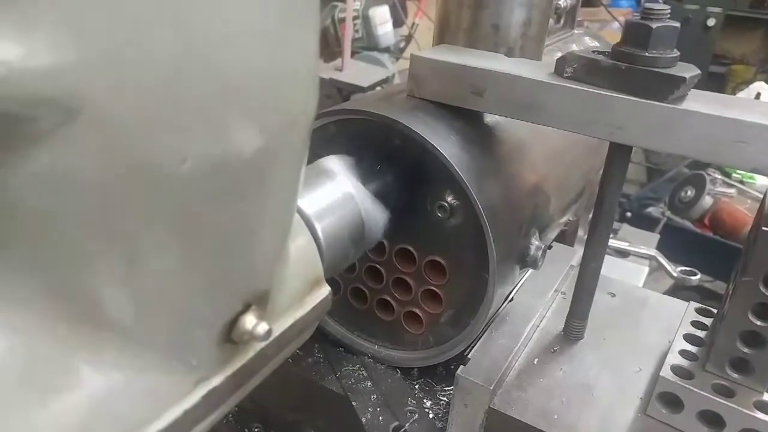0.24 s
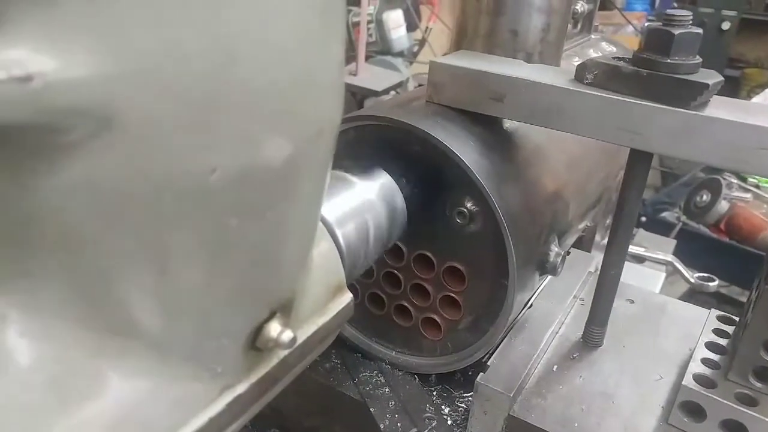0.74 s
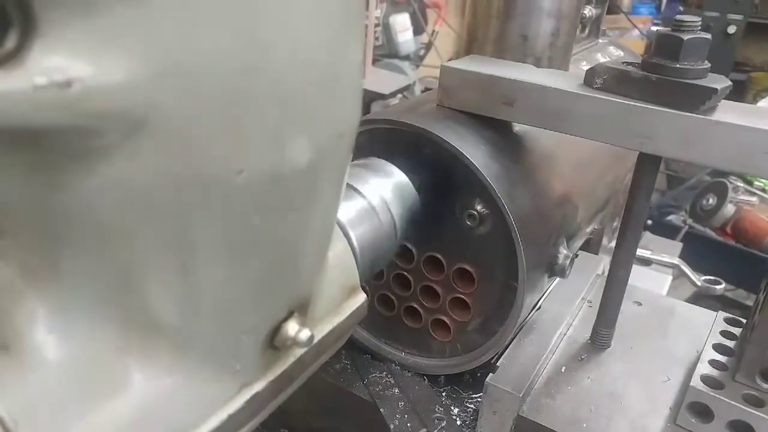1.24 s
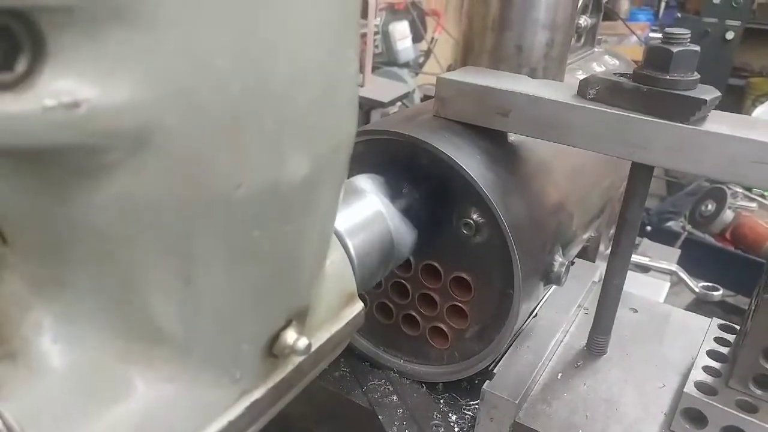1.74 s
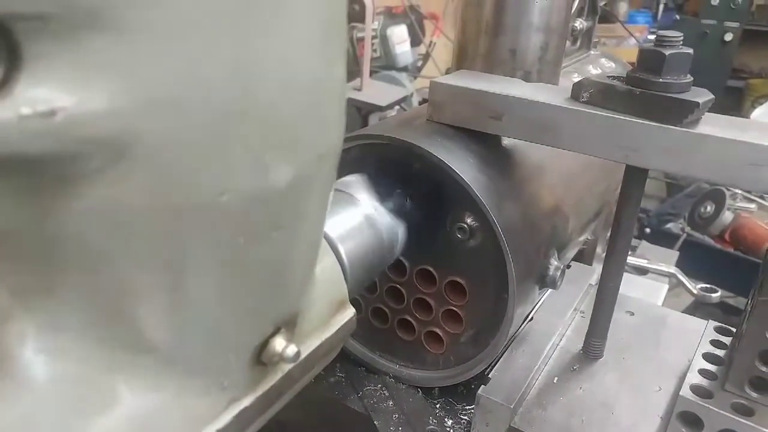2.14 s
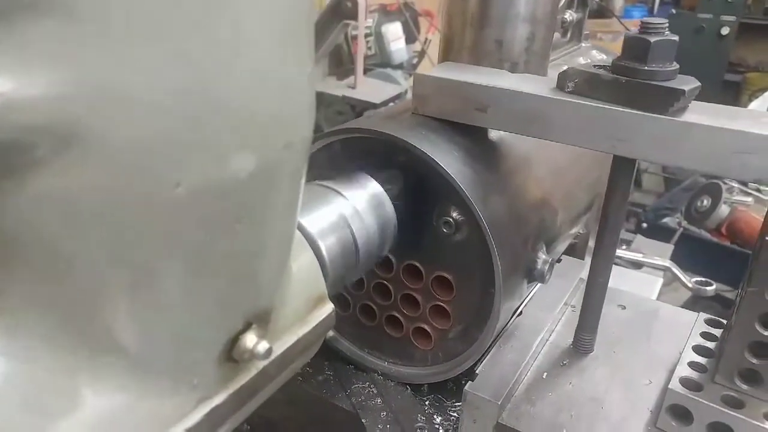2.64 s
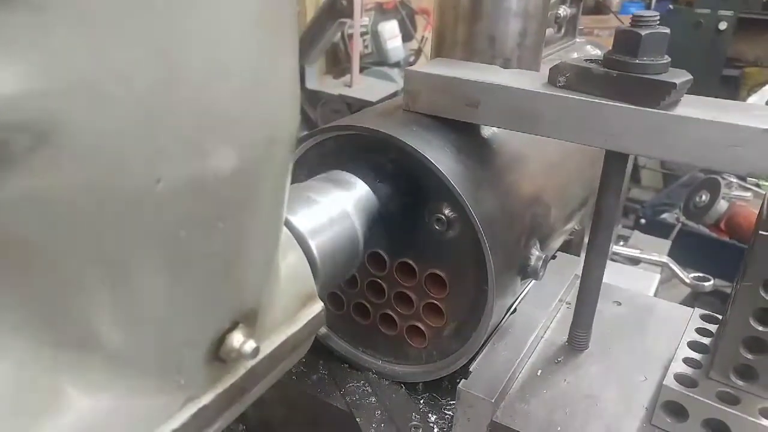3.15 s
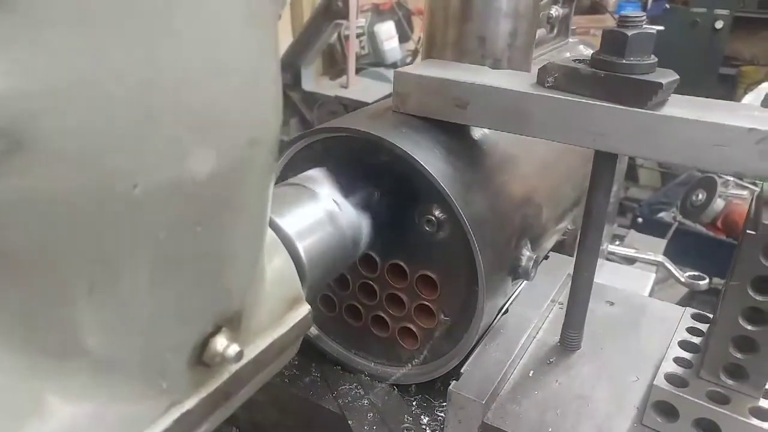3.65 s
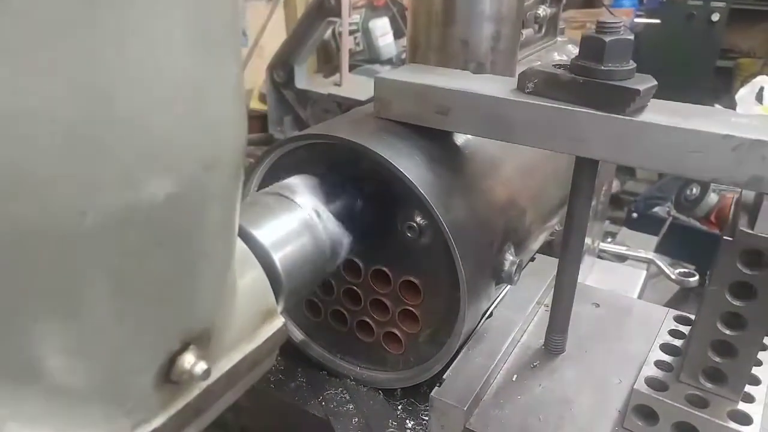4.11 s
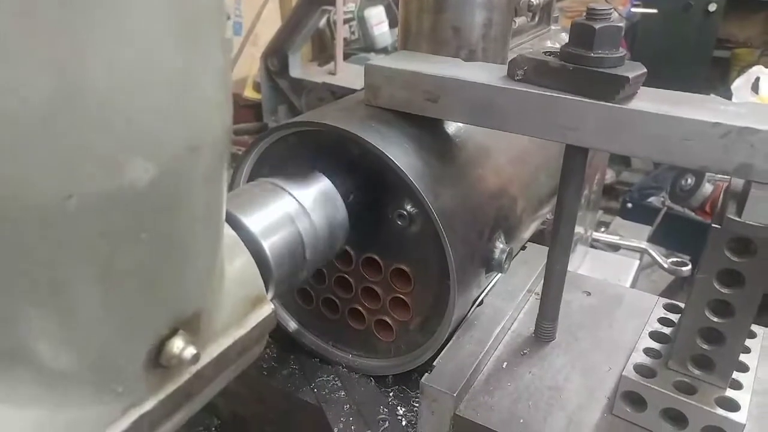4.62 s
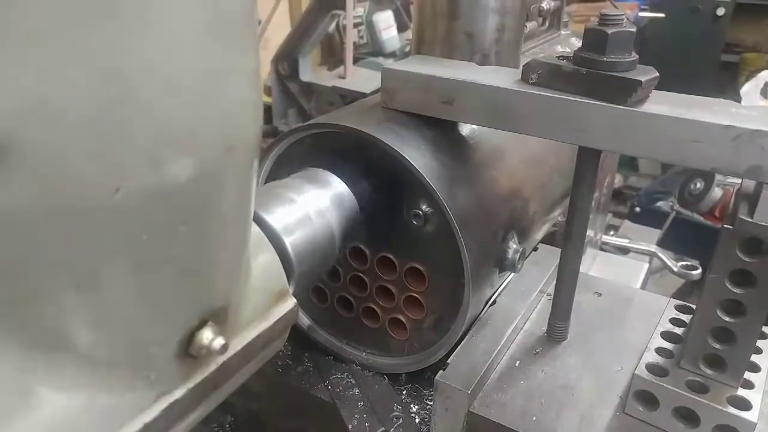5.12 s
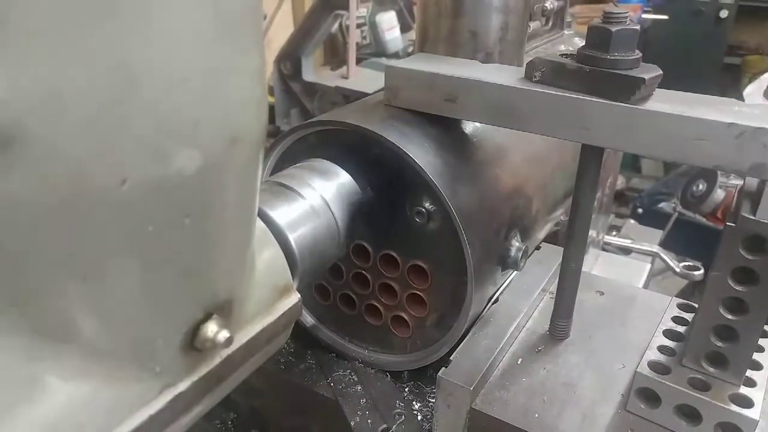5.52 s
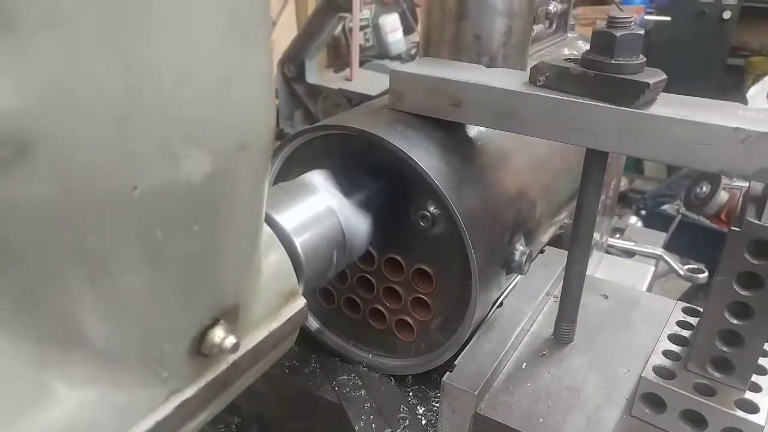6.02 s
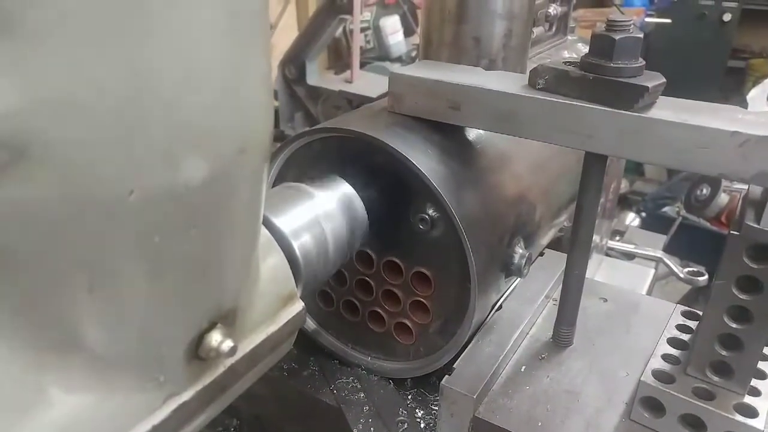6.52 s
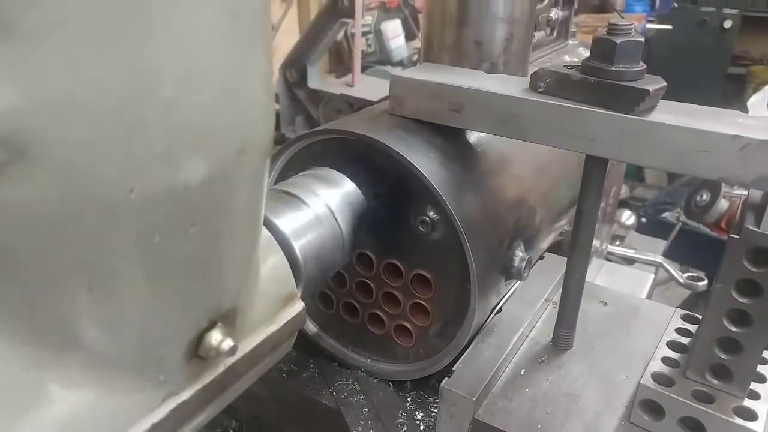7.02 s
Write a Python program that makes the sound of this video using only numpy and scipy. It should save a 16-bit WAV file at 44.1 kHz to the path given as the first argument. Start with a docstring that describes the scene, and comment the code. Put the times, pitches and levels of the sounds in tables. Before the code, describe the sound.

Steady gear whine and rumble from a close milling machine, its cutter hissing, squealing and briefly chirping in metal.

```python
"""Small workshop, one microphone close to a geared milling machine boring a steel boiler's end plate.
From the start three shafts and a gear mesh whine over the rumble of the cast housing, and the tool tip
hisses and squeals in the cut, coloured by an echo off the boiler shell that swings with every turn.
The edge first chirps at 1.2 s, and the drive swells to its loudest near 2 s. Just after 4 s the squeal
peaks in a cluster of chirps; a few more follow between 6 and 7 s as the machine runs on."""
import sys
import numpy as np
from scipy import signal
from scipy.fft import rfft, irfft, next_fast_len
from scipy.io import wavfile
from scipy.ndimage import map_coordinates

SR = 44100
rng = np.random.default_rng(int(sys.argv[2]) if len(sys.argv) > 2 else 0)


def master(y):
    """Save y as 16-bit WAV."""
    cut = np.clip(np.atleast_2d(y).T, -1, 1)
    pcm = np.round(cut * 32767)  # scale
    wavfile.write(sys.argv[1], SR, pcm.astype(np.int16))


N = 320166


def from_db(db):
    """Decibels to gain."""
    return 10 ** (np.asarray(db) / 20)


def rms_one(x):
    """Scale to rms 1."""
    return x / np.sqrt(np.mean(x ** 2) + 1e-20)


def in_time(rows):
    """Each column of a timed table, interpolated to every sample."""
    time_s, *columns = np.transpose(rows)
    return [np.interp(np.arange(N) / SR, time_s, column) for column in columns]


def drift(rate_hz):
    """Random wander of rms 1: coarse noise, low-passed twice at rate_hz."""
    r = np.exp(-200 * np.pi * rate_hz / SR)
    slow = signal.lfilter([1], [1, -2 * r, r * r], rng.standard_normal(N // 100 + 1002))[1000:]
    return np.interp(np.arange(N) / 100, np.arange(len(slow)), rms_one(slow))


def white():
    """Noise of 0 dB per Hz."""
    return rng.standard_normal(N) * np.sqrt(SR / 2)


def colour(x, spectrum):
    """Filter by a curve of dB along log frequency."""
    size = next_fast_len(N)
    hz, db = np.transpose(spectrum)
    bin_hz = np.arange(size // 2 + 1) * SR / size
    gain = from_db(np.interp(np.log(bin_hz + 1), np.log(hz), db, -150))
    return irfft(rfft(x, size) * gain, size)[:N]


def resonate(x, hz, width_hz):
    """A resonance of gain 1 applied twice, for steep flanks."""
    r = np.exp(-np.pi * width_hz / SR)
    section = [(1 - r * r) / 2, 0, (r * r - 1) / 2, 1, -2 * r * np.cos(2 * np.pi * hz / SR), r * r]
    return signal.sosfilt([section, section], x)


def ringing(modes, flutter_db, flutter_hz):
    """Metal resonances shaken by noise, each fluttering in level on its own."""
    return sum(from_db(db + flutter_db * drift(flutter_hz)) * resonate(white(), hz, width_hz)
               for hz, width_hz, db in modes)


def tones(rows, base_hz, waver_db, wobble_turns):
    """Sines on multiples of one rate; each level wavers and their shared angle wobbles."""
    turns = base_hz * np.arange(N) / SR + wobble_turns * drift(1.3)
    out = np.zeros(N)
    for multiple, db in rows:
        angle = 2 * np.pi * (multiple * turns + rng.random())
        out += np.sqrt(2) * from_db(db + waver_db * drift(0.71)) * np.sin(angle)
    return out


SPINDLE_HZ, LAYSHAFT_HZ, PULLEY_HZ, MESH_HZ, MAINS_HZ = 8.666, 11.555, 11.966, 70.78, 59.96
# Harmonics of the three shafts, the gear mesh and the mains: multiple, level_db
SPINDLE_TONES = [(31, -69), (61, -53), (63, -36.5), (65, -44.5), (83, -41.5), (95, -51), (97, -46),
                 (129, -54.5), (162, -60), (185, -61), (214, -53), (250, -55)]
LAYSHAFT_TONES = [(13, -56.5), (21, -67), (22, -65), (24, -48.0), (25, -55), (27, -54.5), (31, -58),
                  (39, -50), (45, -39), (46, -38), (47, -44.5), (48, -43), (54, -48), (55, -59), (57, -48),
                  (60, -43.5), (64, -45), (67, -44), (71, -41), (72, -40.5), (73, -44), (76, -49),
                  (96, -55.5), (97, -56), (99, -62), (173, -60), (175, -54), (176, -55)]
PULLEY_TONES = [(98, -59.0), (99, -52.0), (116, -58.0), (124, -61.0), (127, -59.0), (128, -59.0),
                (131, -57.0), (137, -57.0), (138, -57.0), (165, -54.0), (241, -61.0), (351, -57.0),
                (359, -52.0), (361, -56.0), (388, -56.0)]
MESH_TONES = [(2, -63.5), (4, -53), (6, -50.5), (8, -43), (10, -47), (11, -27.5), (12, -48)]
MAINS_TONES = [(2, -64), (4, -78), (6, -60.5)]
# Other steady tones of the drive: pitch_hz, level_db
OTHER_TONES = [(63.4, -77), (103.1, -67), (329.7, -58), (395.0, -67), (461.6, -49), (475.2, -47.5),
               (768.6, -42), (813.4, -44), (837.3, -38), (861.3, -53.5), (898.5, -54), (915.8, -72),
               (1018.5, -53), (1145.3, -55), (1402.9, -62), (1545.7, -53.5), (1569.7, -49.5), (1665.1, -59),
               (1686.2, -53.5), (1946.7, -54), (1968.9, -59), (1970.8, -51.5), (1988.6, -60),
               (1995.0, -53.5), (2039.6, -61), (4288.8, -49)]

def whine(swell_db):
    """Shafts and gears sing over the mains hum; the mesh tones follow the drive's swell."""
    shafts = (tones(SPINDLE_TONES, SPINDLE_HZ, waver_db=3.5, wobble_turns=0.0013)
              + tones(LAYSHAFT_TONES, LAYSHAFT_HZ, waver_db=2.0, wobble_turns=0.00062)
              + tones(PULLEY_TONES, PULLEY_HZ, waver_db=3.0, wobble_turns=0.00053))
    hum = tones(MAINS_TONES, MAINS_HZ, waver_db=-0.3, wobble_turns=0)
    mesh = from_db(1.4 * swell_db) * tones(MESH_TONES, MESH_HZ, waver_db=0.4, wobble_turns=0.0015)
    others = tones(OTHER_TONES, base_hz=1, waver_db=2.5, wobble_turns=0.00005)
    return shafts + hum + mesh + others


def each_turn(rate_hz, memory):
    """Noise that nearly repeats on every turn, as the same flaws come round again."""
    lag, x = round(SR / rate_hz), white()
    for i in range(lag, N, lag):
        x[i:i + lag] = memory * x[i - lag:i][:N - i] + np.sqrt(1 - memory ** 2) * x[i:i + lag]
    return x


# Broad spectrum of the gears and bearings: frequency_hz, level_db_per_hz
BEARING_SPECTRUM = [(25, -100), (60, -81.5), (200, -76), (400, -75), (600, -60), (900, -64.5),
                    (1300, -70.5), (2100, -69.5), (3200, -78), (3700, -70.5), (4400, -70), (5000, -75.5),
                    (6000, -110)]
# Resonances of the cast housing: pitch_hz, width_hz, peak_db_per_hz
HOUSING_MODES = [(134.3, 20.5, -74.5), (275.8, 23, -69), (346, 64, -65), (410, 12, -87),
                 (465.4, 32.6, -53.5), (522.6, 44, -51.5), (556, 17, -50.5), (634, 4.1, -55.5),
                 (711.3, 39, -59), (751, 30, -51), (767.5, 7, -44.5), (796, 26, -56), (819.5, 28, -48),
                 (885, 81, -60.5), (1150, 215, -70.5), (1412, 52, -69), (1594, 170, -72),
                 (2008, 120, -66.5)]

def rumble(swell_db, repeat_share=0.15):
    """Gear and bearing noise, broad and in the housing; some of its top repeats with the pulley."""
    highpass = signal.butter(2, 1000, "high", fs=SR, output="sos")
    repeating = signal.sosfilt(highpass, each_turn(PULLEY_HZ, memory=0.84))
    broad = colour(np.sqrt(1 - repeat_share) * white() + np.sqrt(repeat_share) * repeating,
                   BEARING_SPECTRUM)
    housing = ringing(HOUSING_MODES, flutter_db=1.93, flutter_hz=9.9)
    return from_db(0.82 * drift(7.0)) * broad + from_db(swell_db) * housing


# Slow swell of the drive, played relative to its mean: time_s, level_db
DRIVE_SWELL = [(0, -24), (.9, -25), (1.5, -22.5), (2.1, -21), (2.7, -22.5), (3.6, -23.5), (4.6, -24.5),
               (5.3, -22.5), (5.8, -23.5), (6.4, -22.5), (7.26, -23)]

def drive():
    """The running gearbox at close range: gear mesh and housing swell together."""
    level_db, = in_time(DRIVE_SWELL)
    swell_db = level_db - level_db.mean()
    return whine(swell_db) + rumble(swell_db)


# Squealing resonances of the boring bar and shell: pitch_hz, width_hz, relative_db
LOW_SQUEAL_MODES = [(4043, 193, 1), (4220, 80, -5.5)]
HIGH_SQUEAL_MODES = [(4787, 260, -1), (4475, 380, -3.5)]

def squeal(low_db, high_db):
    """Friction rings a low and a high squeal, fluttering as the edge grips and slips."""
    low = ringing(LOW_SQUEAL_MODES, flutter_db=1.0, flutter_hz=27)
    high = ringing(HIGH_SQUEAL_MODES, flutter_db=1.8, flutter_hz=27)
    return from_db(low_db) * rms_one(low) + from_db(high_db) * rms_one(high)


# Thin rings of the boiler shell: pitch_hz, width_hz, relative_db
SHELL_MODES = [(5880, 35, 5), (6130, 40, 5), (6450, 40, 3), (6920, 40, 5), (7275, 60, 10), (7420, 40, 4),
               (7630, 50, 5), (7925, 55, 9), (8160, 45, 6), (10170, 60, 3), (11150, 150, 3)]
# Spectrum of the chip hiss: frequency_hz, relative_db
CHIP_SPECTRUM = [(2880, -51), (4900, -17), (5180, -1), (6620, -10), (7530, -7.5), (8190, -11.5),
                 (8940, -20.5), (9800, -14.5), (10500, -14), (14800, -29)]

def chip_hiss(low_db, high_db, mean_db=-38):
    """Bright hiss of tearing metal rises with the high squeal, the shell's rings with the low one."""
    rings = ringing(SHELL_MODES, flutter_db=1.5, flutter_hz=5.7)
    ring_gain = from_db(0.5 * (low_db - low_db.mean()))
    level = from_db(mean_db + 0.22 * (high_db - high_db.mean()))
    return level * rms_one(colour(white() + ring_gain * rings, CHIP_SPECTRUM))


def flicker(x, depth_db):
    """The treble flickers in overlapping bands an eighth of an octave apart, each on its own."""
    size = next_fast_len(N)
    spectrum, out = rfft(x, size), np.zeros(N)
    bin_hz = np.arange(1, size // 2 + 2) * SR / size
    band_position = np.clip(8 * np.log2(bin_hz / 3400), 0, 14)
    for k in range(15):
        band = irfft(spectrum * np.clip(1 - abs(band_position - k), 0, 1), size)[:N]
        out += from_db(depth_db * drift(9.8)) * band
    return out


# Reflection off the shell wall, at mid swing: frequency_hz, gain_db
WALL_REFLECTION = [(3000, -9.5), (5500, -10), (9000, -20)]

def shell_echo(tip, delay_s=0.00036, swing_s=0.00009, swing_db=2, longest_at_turn=0.3):
    """The tool circles the bore: at the microphone, tip and echo form a comb that sweeps once a turn."""
    away = np.cos(2 * np.pi * (SPINDLE_HZ * np.arange(N) / SR - longest_at_turn))
    lag_s = delay_s + swing_s * away
    echo = map_coordinates(colour(tip, WALL_REFLECTION), [np.arange(N) - lag_s * SR], order=3)
    return tip + from_db(-swing_db * away) * echo  # louder where the path is short


# Course of the cut at the tip, ahead of flicker and echo: time_s, low_squeal_db, high_squeal_db
CUT_LEVELS = [(0.0, -40, -35), (0.12, -41.5, -39), (0.38, -42.5, -41.5), (1.39, -36.5, -34),
              (1.45, -40.5, -36.5), (2.38, -36, -34.5), (2.49, -38.5, -37.5), (3.26, -35.5, -38),
              (3.94, -38, -38), (4.18, -31.5, -35), (4.51, -41, -43), (6.17, -34.5, -38.5),
              (7.22, -37, -36.5), (7.26, -33, -34)]

def cut():
    """The tool tip in the end plate: squeal and hiss, heard direct and off the shell wall."""
    low_db, high_db = in_time(CUT_LEVELS)
    tip = squeal(low_db, high_db) + chip_hiss(low_db, high_db)
    return shell_echo(flicker(tip, depth_db=1.05))


# Moments of chatter at the cutting edge: time_s, peak_db, pitch_hz
EDGE_CHIRPS = [(1.1862, -29, 4490), (2.0448, -29, 4750), (2.3054, -30, 4000), (4.0277, -25, 4090),
               (4.1338, -24.5, 4010), (4.1685, -21.5, 4020), (4.2376, -19.5, 4000), (4.2837, -23, 4050),
               (6.2668, -31, 3950), (6.5834, -31, 4120), (6.772, -24, 4020), (6.92, -24, 4080)]

def chirps(length_s=0.018):
    """The edge chatters: each chirp is a short tone that swells and fades."""
    out, n = np.zeros(N), np.arange(round(length_s * SR))
    for time_s, peak_db, pitch_hz in EDGE_CHIRPS:
        start = round((time_s - 0.4 * length_s) * SR)
        tone = np.sin(2 * np.pi * (pitch_hz * n / SR + rng.random()))
        out[start:start + len(n)] += from_db(peak_db) * np.hanning(len(n)) * tone
    return out


def scene():
    """The machine at work, heard in mono from close by."""
    return (drive() + cut() + chirps())[None]


def record(dry, notch_hz=9100, width_hz=230, notch_db=-13, cutoff_hz=15000):
    """The microphone's port puts a narrow dip in the treble; the top is cut off steeply."""
    notch_band = signal.lfilter(*signal.iirpeak(notch_hz, notch_hz / width_hz, SR), dry)
    through_port = dry - (1 - from_db(notch_db)) * notch_band
    return signal.sosfilt(signal.ellip(16, .5, 90, cutoff_hz, fs=SR, output="sos"), through_port)


dry = scene()
out = record(dry)
master(out)
```